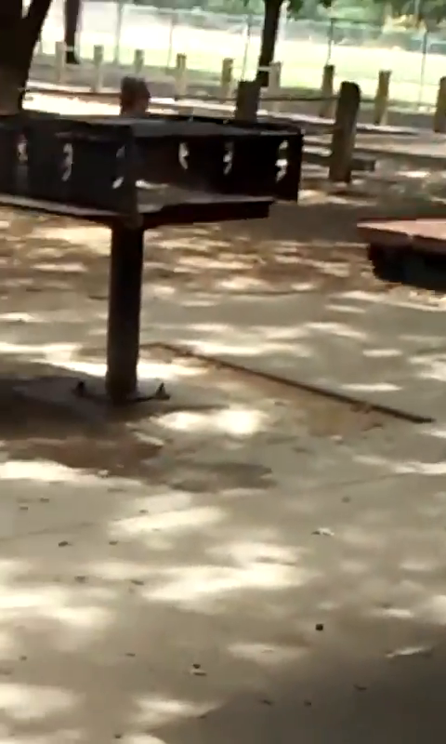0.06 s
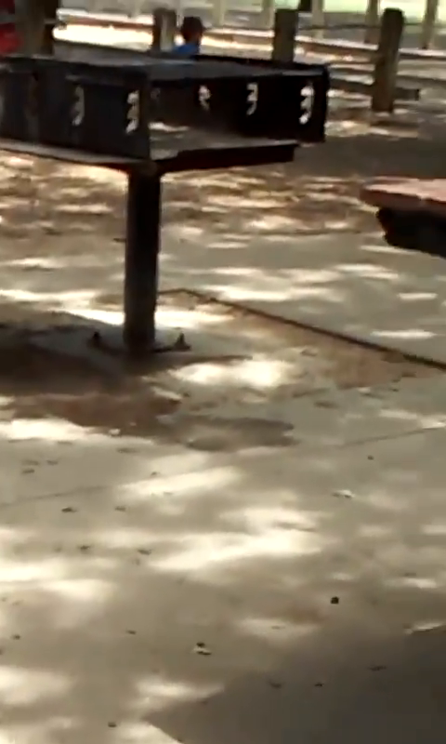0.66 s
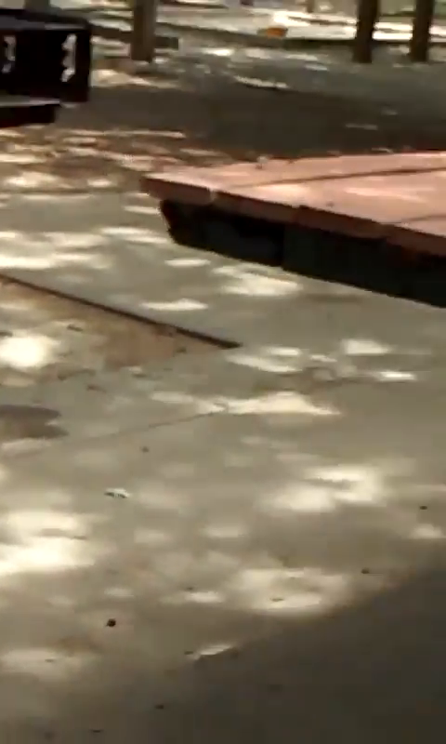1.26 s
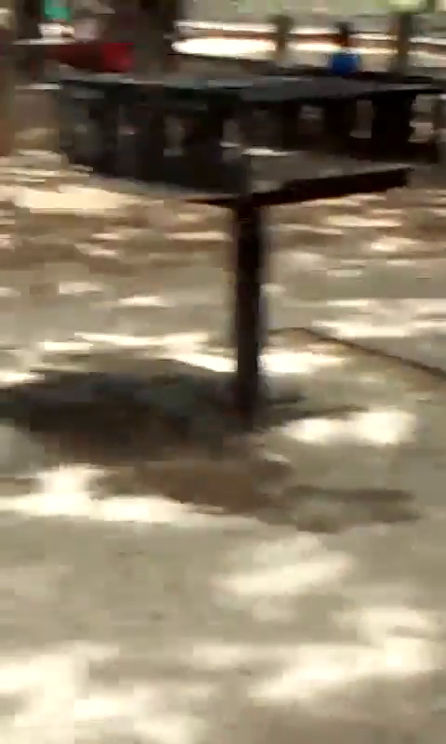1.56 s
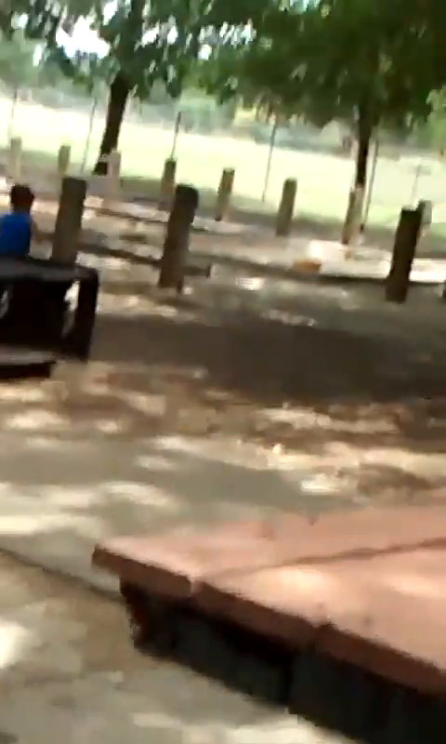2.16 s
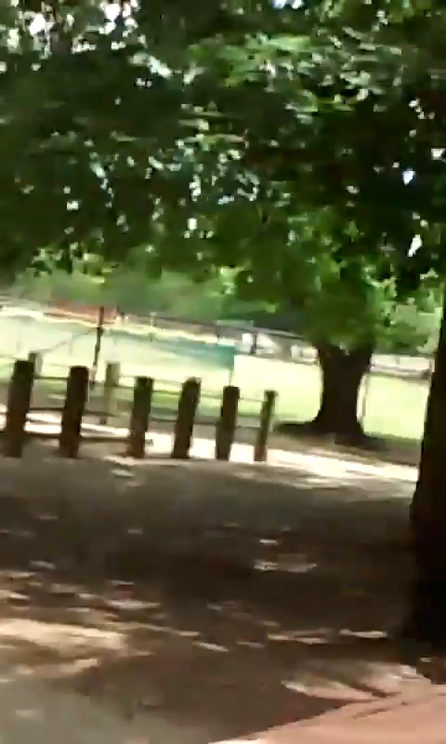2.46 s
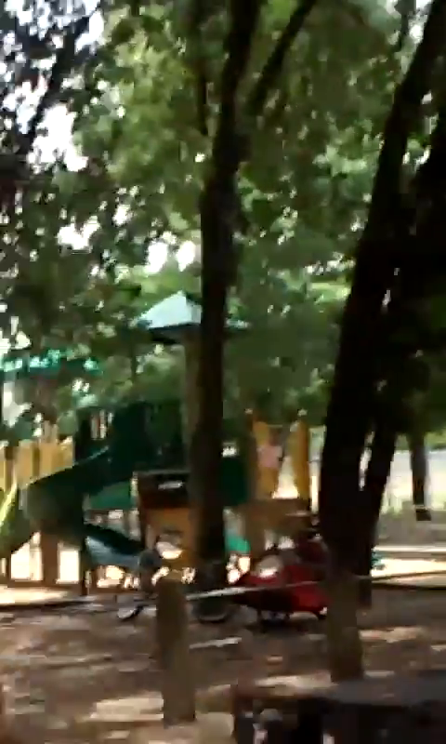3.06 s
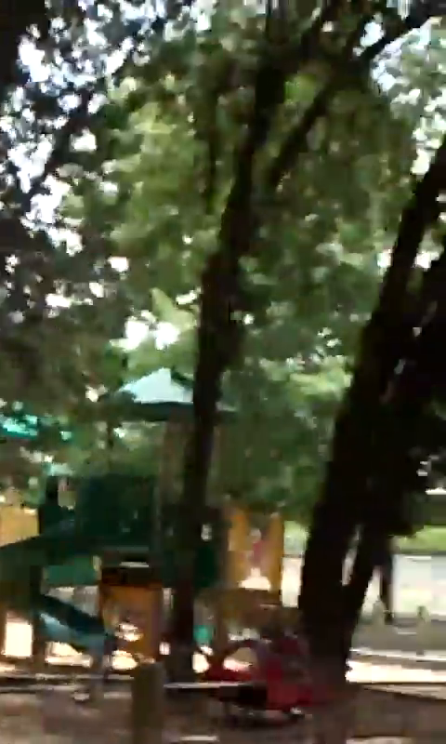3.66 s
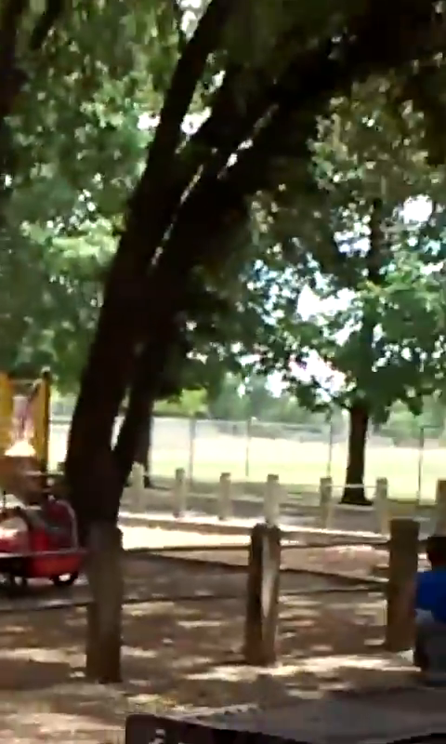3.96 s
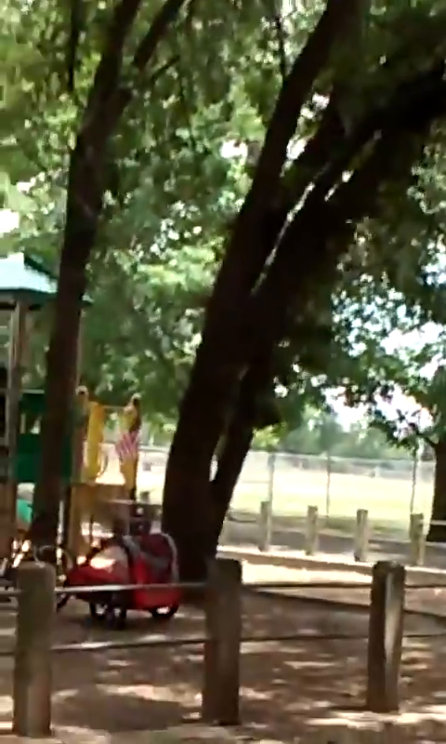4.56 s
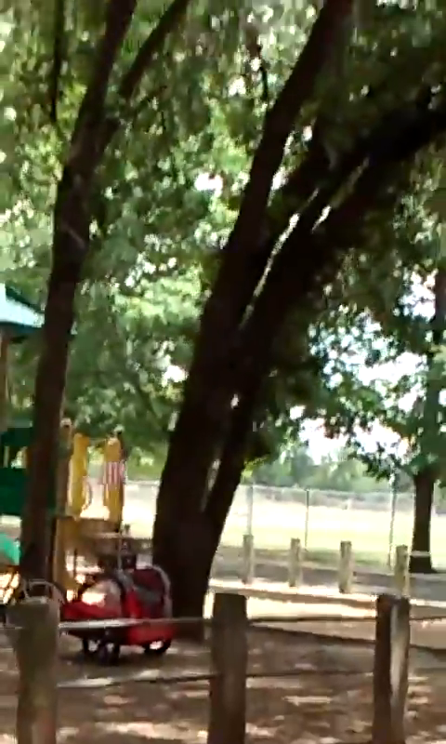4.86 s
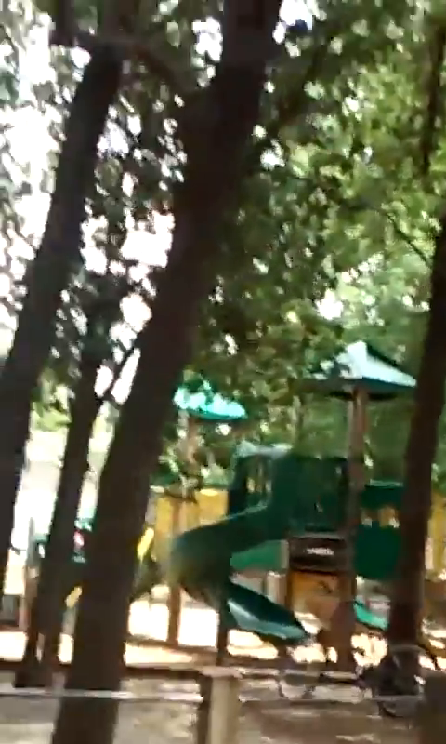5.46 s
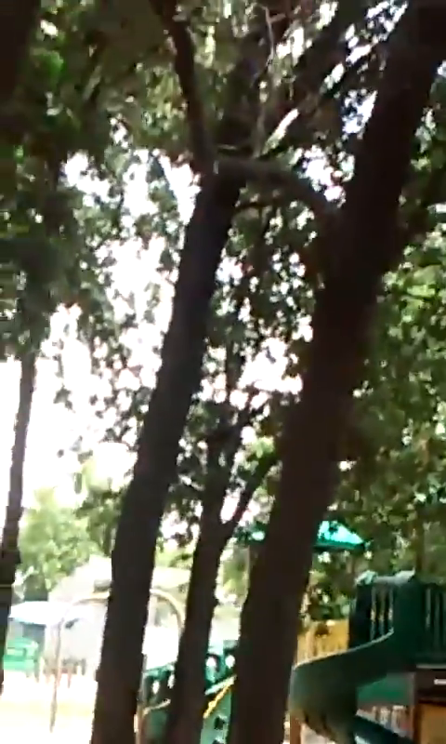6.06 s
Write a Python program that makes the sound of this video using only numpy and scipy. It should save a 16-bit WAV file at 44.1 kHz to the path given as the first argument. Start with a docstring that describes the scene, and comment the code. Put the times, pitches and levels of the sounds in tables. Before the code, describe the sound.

Water spurts from the ground in a park and spatters into its own puddle throughout, a gushing hiss with ticking droplets and light bubbling. At first it is fairly distant, with a brief harder gush near 1.7 seconds. Low puffs and bumps of wind touch the hand-held microphone, strongest around 2.3 seconds, and die away after 4 seconds. From about 2.5 seconds the microphone swings round and moves closer, so the water grows steadily louder and its tone shifts slightly upward. A few soft, hollow handling knocks are scattered between 0.8 and 5.5 seconds, and one shoe scuffs on grit at about 3.5 seconds. From 4 seconds the gurgling is fuller, with big drops slapping down and occasional heavier slops. The water is loudest and closest at the end, around 6.3 seconds. A faint low hum lies under everything.

```python
"""Water spurts from the ground in a park and spatters into its own puddle: blobs burst into hissing
spray, droplets tick, big drops slap down and bubbles gurgle. A hand-held microphone starts far off,
swings round and walks up close, so the water grows louder and the dips and crests of its reflections
glide upward. Behind it are a few soft knocks, one scuffing footstep, puffs of wind on the microphone
and the park's low hum."""
import sys
import numpy as np
from scipy import signal
from scipy.fft import rfft, irfft, next_fast_len
from scipy.io import wavfile
from scipy.ndimage import uniform_filter1d, map_coordinates

SR = 44100
rng = np.random.default_rng(int(sys.argv[2]) if len(sys.argv) > 2 else 0)


def dump(signal):
    """Clip the signal to [-1, 1] and save it as 16-bit WAV at the path in sys.argv[1]."""
    limited = np.clip(np.atleast_2d(signal).T, -1, 1)
    pcm = np.round(limited * 32767).astype(np.int16)
    wavfile.write(sys.argv[1], SR, pcm)


N = 277830
TOP_HZ = 15800  # the microphone's upper limit
# places on the walk (0 far, 1 close) where the microphone starts to swing, passes the water, faces it
SWING_AT, PASS_AT, FACE_AT = 0.537, 0.601, 0.8


# the jet's flow as heard at the microphone: (time [s], level [dB])
JET_FLOW = [(0, -39.3), (.5, -42.3), (1.4, -41.5), (1.9, -37.5), (2.3, -39), (2.55, -42), (2.74, -39),
            (2.765, -36.5), (2.95, -35), (3.45, -30.5), (3.8, -32), (6.25, -24.7)]
# brief harder gushes: (start [s], rise [s], hold [s], fall [s], boost [dB])
JET_GUSHES = [(0.113, 0.034, 0.18, 0.022, 1), (0.855, .04, 0.062, 0.016, 2), (1.664, 0.072, 0.13, 0.016, 4),
              (2.76, .008, 0.025, 0.017, 0.5)]

def water():
    """The surging jet drives spray and gurgle; the gurgle carries less far than the spray."""
    blobs = spatter(rate=380, life_s=0.0017, spread_db=3, steady=0.3)
    treble = amp(0.44) * heard_on_walk(spray(blobs))
    churn = gurgle(blobs)
    churn_db = np.interp(place(), [PASS_AT, FACE_AT], [-25.5, -14.5]) + 0.45 * wobble(5.1)
    surge_db = 0.5 * wobble(7) + sum(db * swell(*timing) for *timing, db in JET_GUSHES)
    flow_db, = curves(JET_FLOW)
    return amp(flow_db + surge_db) * (treble + amp(churn_db) * churn)


def spray(blobs, split_hz=6300):
    """Blobs burst into coarse drops and fine mist, each with bursts of its own; droplets ring."""
    coarse = blobs + spatter(rate=220, life_s=0.004, spread_db=2.2, steady=0.04)
    coarse = filtered(coarse * rng.standard_normal(N), lambda hz: hz < split_hz)
    mist = blobs + spatter(rate=700, life_s=0.0006, spread_db=3.1, steady=0.12)
    mist = filtered(mist * rng.standard_normal(N), lambda hz: hz >= split_hz)
    ticks = grains(rate=2600, low_hz=3050, high_hz=15880, cycles=2.6, spread_db=3, samples=160)
    plinks = grains(rate=420, low_hz=2000, high_hz=6430, cycles=8, spread_db=3.5, samples=500)
    return echoed(unit(coarse + mist) + amp(-5) * blobs * ticks + amp(-10) * plinks, drift=0.0614)


# colour of the churning puddle: (frequency [Hz], gain [dB])
PUDDLE_COLOUR = [(201.0, -46), (455.0, -3), (696.0, -17), (867.0, -0.4), (1120.0, -8.5), (1390.0, 5),
                 (1790.0, -3), (1960.0, -19.6), (3000.0, -8)]

def gurgle(blobs):
    """Bubbles ring in the puddle as the falling blobs churn it."""
    bubbles = grains(rate=450, low_hz=860, high_hz=2073, cycles=5.6, spread_db=3.5, samples=700)
    churn = amp(4) * blobs * rng.standard_normal(N)
    return echoed(coloured(bubbles + churn, PUDDLE_COLOUR), drift=0.09)


# weak echoes off the ground and things close by: (delay [s], gain [ratio])
NEARBY_ECHOES = [(.00095, 0.094), (.0021, 0.11), (.0046, 0.16)]

def echoed(x, drift):
    """Short echoes ripple the spectrum; their delays drift as the microphone moves."""
    echoes = np.zeros(N)
    for delay, gain in NEARBY_ECHOES:
        lag = delay * SR * (1 + drift * wobble(0.925))
        echoes += gain * map_coordinates(x, [np.arange(N) - lag])
    return unit(x + echoes)


# the microphone's walk up to the water: (time [s], place [0 far, 1 close])
MIC_WALK = [(0, 0), (1.45, 0.13), (2.2, 0.18), (2.4, .545), (2.6, 0.59), (2.9, 0.59), (3.4, 0.623),
            (4.1, 0.81), (6.3, 0.98)]

def place(t=None):
    """How far the microphone has come at times t."""
    return curves(MIC_WALK, t)[0]


def heard_on_walk(x, treble_hz=5000, patchy_db=6):
    """The spray changes colour as the microphone moves, while its treble keeps its power."""
    hz, t, spectra = signal.stft(x, SR, nperseg=1024)
    f = hz[:, None]
    db = distance_colour(t, f) + ground_ripple(t, f) + hollows_and_crests(t, f) + whistle(t, f)
    # scattered reflections leave drifting patches, deepest in the lower range
    patches = uniform_filter1d(rng.standard_normal(spectra.shape), size=5, axis=0)
    patches = unit(uniform_filter1d(patches, size=26, axis=1))
    gain = amp(db + patchy_db * patches / (1 + f / 3000)) * (f < TOP_HZ)
    gain /= np.sqrt(np.mean(gain[hz > treble_hz] ** 2, axis=0))
    return signal.istft(spectra * gain, SR, nperseg=1024)[1][:N]


# the spray from far off, as the microphone swings past, and close up: (frequency [Hz], gain [dB])
FAR_COLOUR = [(200.0, -29.0), (424.0, -23), (783.0, -6.5), (1530.0, -8.0), (2320.0, -1.5), (3030.0, 3.5),
              (5090.0, 0.4), (8220.0, 1.2), (11200.0, -0.5), (12300.0, -6.5), (13700.0, -5),
              (15700.0, -9.3)]
PASSING_COLOUR = [(200.0, -9), (494.0, -24), (1180.0, -6.5), (1720.0, -10.5), (2130.0, -4.5),
                  (3200.0, -4.5), (3980.0, -2.5), (5390.0, -1.2), (6560.0, -4.1), (7460.0, 5), (11700.0, 0),
                  (13300.0, -2.5), (15700.0, -6.5)]
CLOSE_COLOUR = [(200.0, -22), (605.0, -25), (1520.0, -0.7), (2440.0, -10.5), (3470.0, -3.5), (4580.0, 4),
                (5480.0, 2.9), (6230.0, -11.5), (6610.0, -1.5), (8160.0, 1.65), (10400.0, 2.5),
                (11000.0, -0.5), (13100.0, -2.5), (15700.0, -7.5)]
# narrow resonances: (frequency [Hz], width [Hz], gain far [dB], gain passing [dB], gain close [dB])
RESONANCES = [(540, 96, 9.9, -2, 5.5), (885, 70, 12, 10.5, 8)]

def distance_colour(t, f):
    """The far colour blends through the passing one into the close one, in dB."""
    stage = np.interp(place(t), [SWING_AT, PASS_AT, FACE_AT], [0, 1, 2])
    colours = [FAR_COLOUR, PASSING_COLOUR, CLOSE_COLOUR]
    db = sum(np.clip(1 - abs(stage - k), 0, 1) * along(colour, f) for k, colour in enumerate(colours))
    for hz, width, *stage_db in RESONANCES:
        db += np.interp(stage, [0, 1, 2], stage_db) * bell(f, hz, width)
    return db


# ripples in the treble: (time [s], spacing [Hz], depth [dB])
GROUND_RIPPLES = [(1.5, 2020, 0.5), (2.103, 2420.0, 3.7), (2.606, 2610.0, 0), (2.881, 2770, 3.5),
                  (3.352, 2920, 3.5), (3.726, 2930.0, 3), (4.209, 3050.0, 0), (6.3, 3250.0, 0.7)]
# their range: (start [Hz], full from [Hz], full to [Hz], end [Hz])
RIPPLE_BAND = [4000, 6500, 12000, 16000]

def ground_ripple(t, f):
    """The ground reflection leaves even ripples, in dB, that spread as the microphone closes in."""
    spacing, depth_db = curves(GROUND_RIPPLES, t)
    return depth_db * np.cos(2 * np.pi * f / spacing) * np.interp(f, RIPPLE_BAND, [0, 1, 1, 0])


# two hollows that glide upward, fading and returning: (time [s], centre [Hz], gain [dB])
LOW_HOLLOW = [(0.0, 921.0, -19), (0.605, 970.0, -12), (0.909, 1140.0, -12), (1.36, 1290, -5),
              (1.645, 1330.0, 8), (1.955, 1330.0, -24), (2.28, 1620, -25), (2.467, 1760.0, 0),
              (2.767, 1800, -10), (2.991, 1860, -2), (3.514, 1920, -4.5), (4.147, 2140, -17.5),
              (4.9, 2120, -14), (5.302, 2140, -1.5), (6.3, 2220, 0.5)]
HIGH_HOLLOW = [(0.0, 3410, -12), (1.484, 3480, -3), (1.795, 4120, -8), (2.21, 4080.0, -17.7),
               (2.351, 4510.0, -14), (2.635, 4690.0, -3), (2.927, 4680.0, -13), (3.205, 4700, -10),
               (3.512, 4900, -1.3), (3.794, 5050, -9.5), (6.3, 5180, -10)]
# passing crests and one dip: (time [s], reach [s], centre [Hz], glide [Hz/s], gain [dB])
PASSING_CRESTS = [(.186, .43, 7250, 0, 7.5), (1.26, 0.87, 2310, 60, 10), (2.029, 0.36, 5400, 672, 8),
                  (2.4, 0.46, 6900, 0, -7), (2.963, 0.23, 3730, -380, 7), (3.32, 0.34, 5410, 0, 10)]

def hollows_and_crests(t, f, width_hz=175, widening=0.089):
    """Bands of the hiss sink and stand out along the walk, in dB; higher ones are wider."""
    db = 0
    for hollow in (LOW_HOLLOW, HIGH_HOLLOW):
        centre, gain_db = curves(hollow, t)
        db += gain_db * bell(f, centre, width_hz + widening * centre)
    for s, reach, hz, glide, gain_db in PASSING_CRESTS:
        db += gain_db * bell(t, s, reach) * bell(f, hz + glide * (t - s), width_hz + widening * hz)
    return db


# a narrow resonance in the hiss: (time [s], centre [Hz], gain [dB])
WHISTLE_TRACK = [(0, 3200, 7), (.326, 3310, 12), (.902, 3170, 11), (1.397, 3220, 7), (1.781, 3280, 4.5),
                 (2.018, 3310, 16), (2.23, 3250, 8.5), (2.346, 3590, 12.5), (2.542, 3300, 4.5),
                 (2.794, 3280, -6.5), (3.892, 3300, 2.5), (4.786, 3290, 5.5), (5.8, 3280, -7)]

def whistle(t, f, width_hz=230):
    """A faintly whistling resonance, in dB, wavers and bends up as the microphone swings."""
    centre, gain_db = curves(WHISTLE_TRACK, t)
    return gain_db * bell(f, centre, width_hz)


# single big drops landing: (time [s], relative level [dB], centre [Hz])
BIG_DROPS = [(0.014, -25, 7660), (1.438, -27.5, 3900), (1.6517, -15.5, 8400), (1.716, -28, 6440),
             (1.7327, -19, 5000), (1.8604, -22.5, 5740), (1.974, -28, 2770), (2.01, -37, 2300),
             (2.033, -31.5, 2570), (2.2384, -28, 5400), (2.267, -33, 2750), (2.462, -37.5, 1800),
             (2.595, -36.5, 2420), (2.759, -23, 8920), (2.912, -24, 8200), (2.997, -36, 1920),
             (3.142, -24, 3200), (3.401, -30.5, 2500), (3.473, -19.5, 8140), (3.6466, -21, 4400),
             (3.981, -32, 1480), (4.226, -14, 10500), (4.542, -16.5, 3700), (4.623, -33, 1640),
             (4.938, -12.5, 9200), (5.15, -19.5, 4340), (5.237, -27.5, 1450), (5.422, -18.5, 4200),
             (5.513, -11.5, 9600), (5.582, -16.5, 4170), (5.7848, -18.5, 4100), (5.8088, -9.5, 9700),
             (5.921, -19, 5300), (5.987, -14.5, 8500), (6.008, -14.5, 10400), (6.0766, -18, 4760),
             (6.1074, -22, 8000), (6.112, -25.5, 2680), (6.2938, -13, 9400)]

def splats(rise_s=0.0004, fall_s=0.0014, tail_s=0.0085, width_octaves=0.58):
    """Big drops slap down with a weak tail of spray; lower ones start softer and last longer."""
    out, t = np.zeros(N), np.arange(2048) / SR
    octave = np.log2(np.fft.rfftfreq(len(t), 1 / SR) + 1)
    for s, db, hz in BIG_DROPS:
        age = t * (hz / 9000) ** 0.7  # the time settings hold for a 9 kHz drop
        burst = irfft(rfft(rng.standard_normal(len(t))) * bell(octave, np.log2(hz), width_octaves))
        burst *= (1 - np.exp(-age / rise_s)) * (np.exp(-age / fall_s) + 0.08 * np.exp(-age / tail_s))
        add(out, s, amp(db + 2.5) * burst / abs(burst).max())
    return out


# heavy slops into the puddle: (time [s], level [dB], length [s])
PUDDLE_SLOPS = [(1.537, -53, 0.23), (3.106, -41.5, 0.073), (4.554, -34.5, 0.065), (5.067, -35, 0.03),
                (5.143, -36, 0.0068), (6.173, -27, 0.028), (6.29, -24.5, .012)]

def slops():
    """Heavier lumps of water fall back with a duller splash."""
    envelope, t = np.zeros(N), np.arange(SR // 2) / SR
    for s, db, length in PUDDLE_SLOPS:
        add(envelope, s, amp(db) * pulse(2 * t / length))
    splash = noise([(500, -5), (1500, 8), (2300, 6.5), (4000, 18.5), (5500, -16), (10000, -40)])
    lumps = spatter(rate=400, life_s=0.0034, spread_db=2.5, steady=0.4)
    return envelope * unit(splash * lumps)


# soft handling knocks: (time [s], relative level [dB], pitch [Hz])
HANDLING_KNOCKS = [(0.828, -32.5, 455), (2.331, -26.5, 546), (2.998, -28, 538), (3.252, -40.5, 312),
                   (3.498, -24.5, 810), (3.633, -32.5, 756), (4.231, -37.5, 590), (4.86, -27.5, 508),
                   (5.043, -35.5, 840), (5.488, -25, 740)]

def knocks(rub_db=-9, rub_s=0.016):
    """Hollow knocks ring for a few cycles, each with a gritty rub."""
    out, t = np.zeros(N), np.arange(SR // 10) / SR
    grit = noise([(100, -6), (550, 20), (1300, 3), (2100, 4), (5000, -43)])
    for s, db, hz in HANDLING_KNOCKS:
        ring = np.sin(2 * np.pi * hz * t) * pulse(hz * t)
        rub = grit[round(s * SR):][:len(t)] * np.exp(-t / rub_s) * np.minimum(hz * t, 1)
        add(out, s, amp(db - 2) * (ring + amp(rub_db) * rub))
    return out


# heel, then sole, meeting the ground: (time [s], level [dB])
HEEL_AND_SOLE = [(3.534, -22), (3.613, -42)]
# colour of a shoe on grit: (frequency [Hz], gain [dB])
SCUFF_COLOUR = [(150, -7), (380, -11), (600, 3.5), (1150, 6), (1800, 4.5), (3000, -7), (4000, 4),
                (5500, -7.5), (10000, -38)]

def footstep():
    """A shoe scuffs once over gritty ground."""
    grit = spatter(rate=920, life_s=0.0012, spread_db=1, steady=0.82)
    pressure = sum(amp(db) * swell(s, rise=0.006, hold=0.0096, fall=0.021) for s, db in HEEL_AND_SOLE)
    return pressure * unit(noise(SCUFF_COLOUR) * grit)


# puffs of wind on the microphone: (time [s], level [dB], hold [s])
WIND_PUFFS = [(0.066, -45, 0.072), (0.781, -43.5, 0.12), (1.19, -40.5, 0.053), (1.81, -45, 0.12),
              (2.061, -37.5, 0.033), (2.252, -36.5, 0.22), (3.884, -44.5, 0.049)]
# colour of their rumble: (frequency [Hz], gain [dB])
WIND_COLOUR = [(20, -0.5), (50, 4.5), (95, 1.5), (160, -8), (260, -18.5), (600, -36)]
# low bumps of air on the microphone: (time [s], relative level [dB], pitch [Hz])
AIR_BUMPS = [(.797, -23.5, 83), (0.864, -24, 84), (1.204, -24, 87.6), (1.337, -27.5, 95), (1.578, -32, 192),
             (2.249, -14, 127), (2.26, -20, 110), (2.302, -25, 112), (2.346, -15.5, 162), (2.431, -14, 86),
             (3.625, -26.5, 187), (3.915, -19, 63)]

def wind(rise_s=0.018, fall_s=0.061, bump_rise_cycles=0.34):
    """Air rumbles on the microphone in puffs and bumps; the breeze drops as the microphone turns."""
    breeze = amp(np.interp(place(), [SWING_AT, PASS_AT], [-53, -59.5]))
    puffs = sum(amp(db) * swell(s - rise_s, rise_s, hold, fall_s) for s, db, hold in WIND_PUFFS)
    rumble = unit(noise(WIND_COLOUR) * amp(4.4 * wobble(24.7)))
    out = np.hypot(breeze, puffs) * rumble
    t = np.arange(SR // 10) / SR
    for s, db, hz in AIR_BUMPS:
        add(out, s, amp(db - 7) * np.sin(2 * np.pi * hz * t) * pulse(hz * t / bump_rise_cycles))
    return out


# colour of the park's background: (frequency [Hz], gain [dB])
PARK_COLOUR = [(20, 1.5), (60, -10), (80, 5), (130, -1), (250, -6.5), (400, -10), (600, -8), (1000, -14.5),
               (3000, -34)]

def park():
    """A low, steady hum lies under everything."""
    return amp(-57) * noise(PARK_COLOUR)


def spatter(rate, life_s, spread_db, steady):
    """Envelope of water or grit landing, rate times a second: each hit dies in milliseconds."""
    when, strength = rng.random((int(rate * N / SR), 2)).T
    energy = amp(-spread_db * np.log(1 - 0.985 * strength)) ** 2
    hits = np.bincount((when * N).astype(int), energy, N)
    power = signal.lfilter([1], [1, -np.exp(-1 / (life_s * SR))], hits)
    # the supply is steady, so the bursts even out over a twentieth of a second
    supply = abs(uniform_filter1d(power, size=SR // 20)) + 0.5 * power.mean()
    return np.sqrt(steady + power / supply / np.mean(power / supply))


def grains(rate, low_hz, high_hz, cycles, spread_db, samples):
    """Tiny damped rings at random times, pitches and strengths, at rms 1."""
    when, pitch, strength, life = rng.random((int(rate * N / SR), 4)).T[:, :, None]
    hz = low_hz + (high_hz - low_hz) * pitch
    k = np.arange(samples)
    turns = hz * k / SR
    weight = amp(-spread_db * np.log(1 - 0.99 * strength)) * hz
    rings = weight * np.sin(2 * np.pi * turns) * np.exp(-turns / (cycles * (0.5 + life)))
    positions = (when * N).astype(int) + k
    return unit(np.bincount(positions.ravel(), rings.ravel(), N)[:N])


def amp(db):
    """Decibels to gain."""
    return 10 ** (np.asarray(db) / 20)


def unit(x):
    """Scaled to rms 1."""
    return x / np.sqrt(np.mean(x ** 2) + 1e-20)


def along(points, hz):
    """(Hz, value) points read on a log axis."""
    f, v = np.transpose(points)
    return np.interp(np.log(hz + 1), np.log(f + 1), v)


def curves(rows, t=None):
    """Each column after the time, read at times t (every sample by default)."""
    s, *cols = np.transpose(rows)
    return [np.interp(np.arange(N) / SR if t is None else t, s, c) for c in cols]


def wobble(rate):
    """A smooth random curve, rate knots a second."""
    return map_coordinates(rng.standard_normal(int(N * rate / SR) + 4), [np.arange(N) * rate / SR])


def filtered(x, response):
    """x times a response of frequency."""
    m = next_fast_len(N + SR // 2)
    return irfft(rfft(x, m) * response(np.fft.rfftfreq(m, 1 / SR)), m)[:N]


def coloured(x, spectrum):
    """x shaped by a (Hz, dB) spectrum, at rms 1."""
    return unit(filtered(x, lambda hz: amp(along(spectrum, hz))))


def noise(spectrum):
    """Noise of rms 1 with a (Hz, dB) spectrum."""
    return coloured(rng.standard_normal(N), spectrum)


def bell(x, centre, width):
    """A smooth hump of height 1."""
    return np.exp(-2 * ((x - centre) / width) ** 2)


def pulse(u):
    """Rises to 1 at u = 1, then dies away."""
    return u * np.exp(1 - u)


def swell(start, rise, hold, fall):
    """An envelope that rises, holds and dies away; times in seconds."""
    t = np.arange(N) / SR - start
    return np.clip(t / rise, 0, 1) * np.exp(-np.maximum(t - rise - hold, 0) / fall)


def add(track, s, sound):
    """Mix a sound in at time s."""
    part = track[max(round(s * SR), 0):][:len(sound)]
    part += sound[:len(part)]


def scene():
    """Water, handling, a footstep and wind over the park's hum, in mono."""
    background = park()
    return (water() + splats() + slops() + knocks() + footstep() + wind() + background)[None]


def record(dry):
    """The hand-held microphone keeps nothing above its upper limit."""
    return filtered(dry[0], lambda hz: hz < TOP_HZ)[None]


dry = scene()
out = record(dry)
dump(out)
```